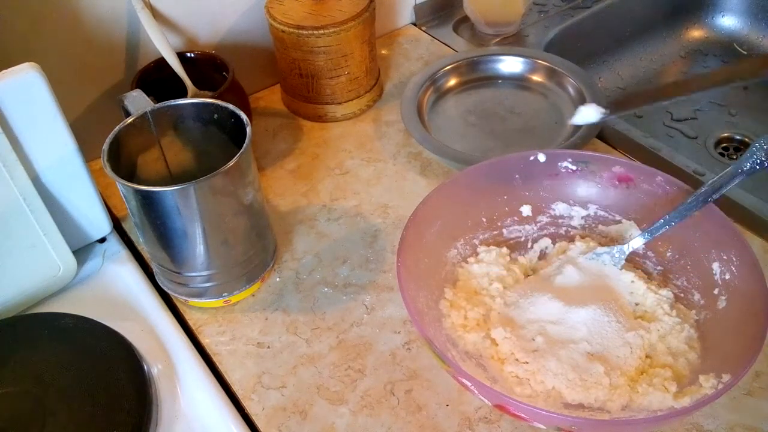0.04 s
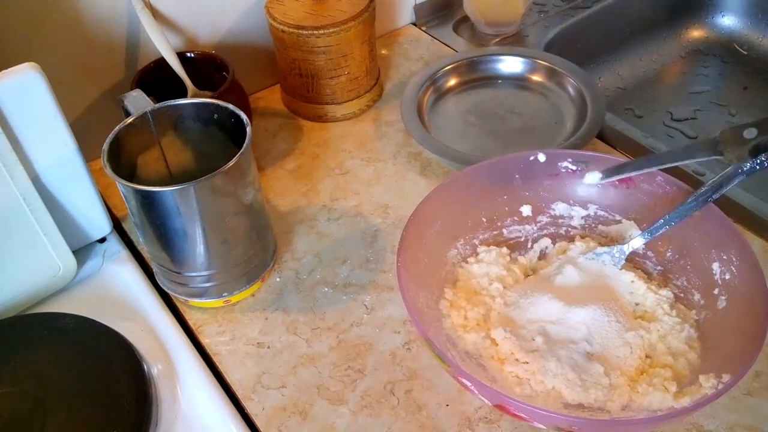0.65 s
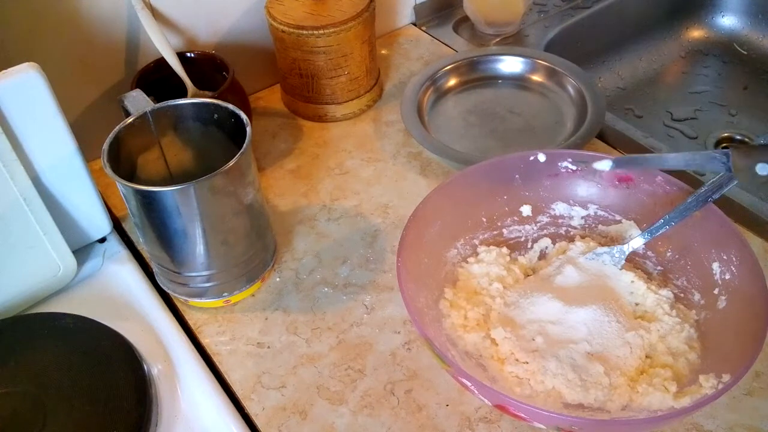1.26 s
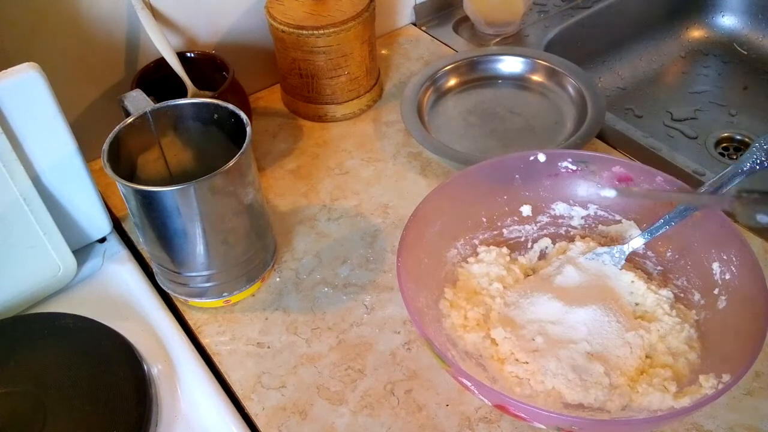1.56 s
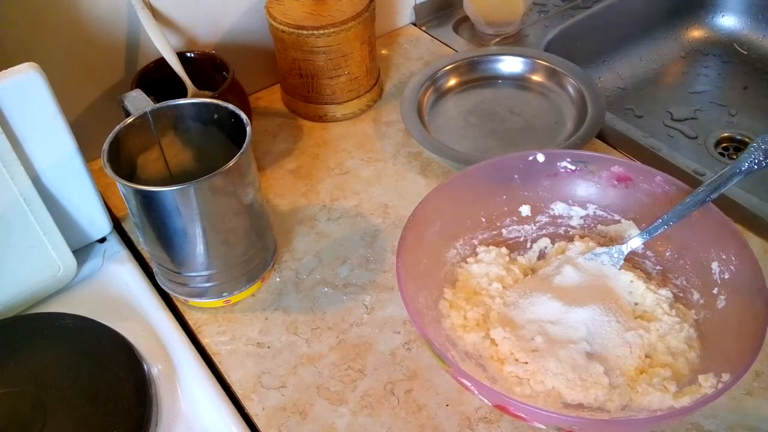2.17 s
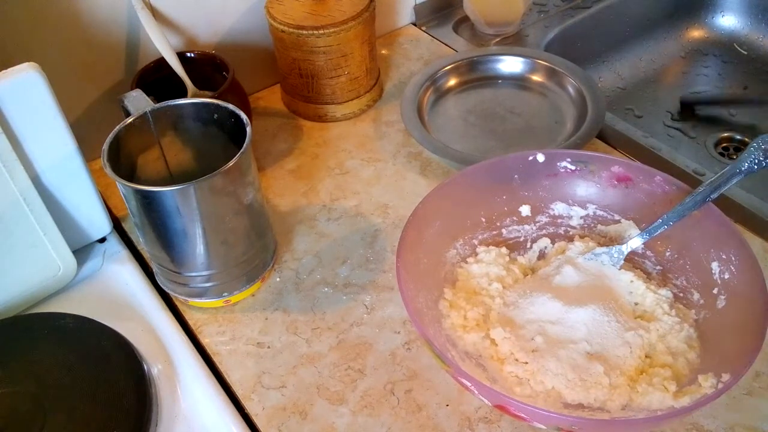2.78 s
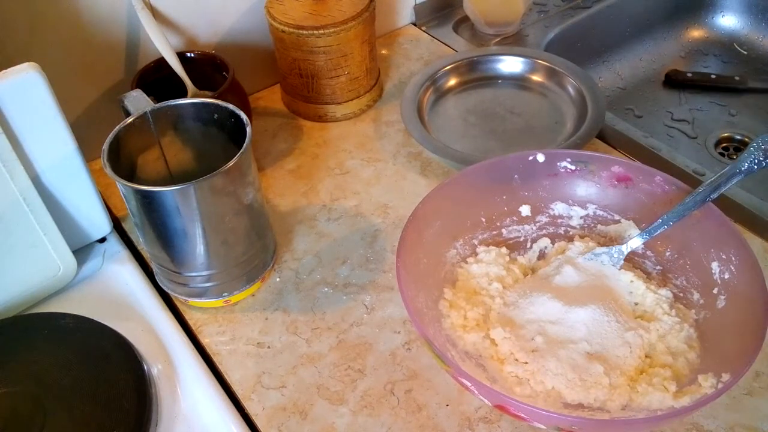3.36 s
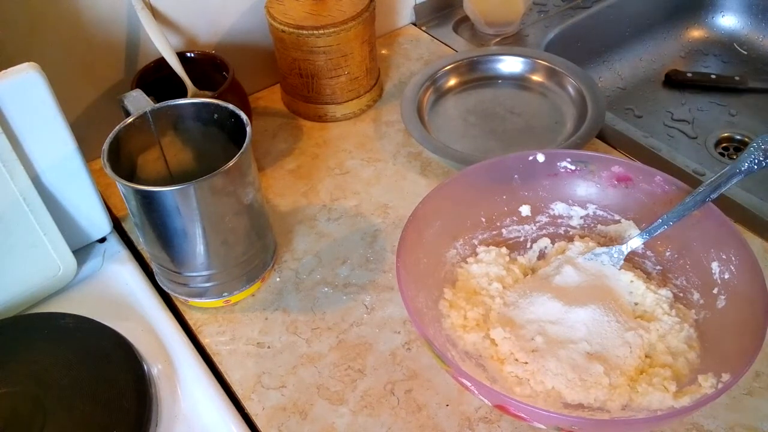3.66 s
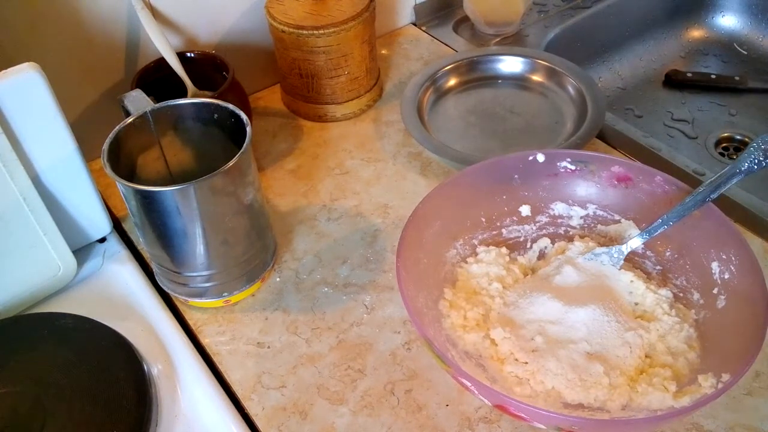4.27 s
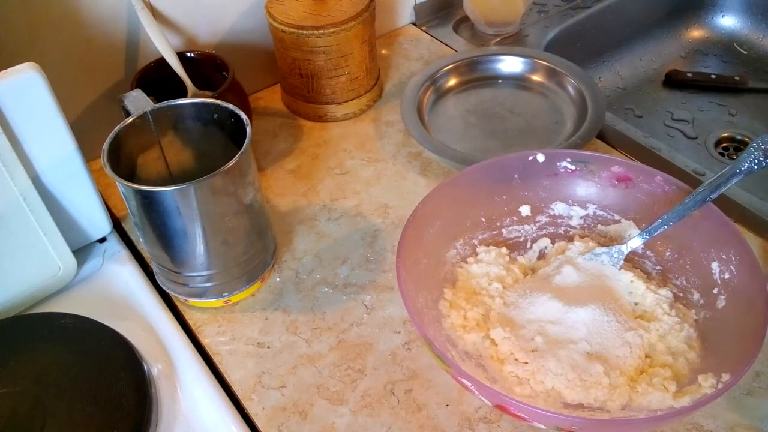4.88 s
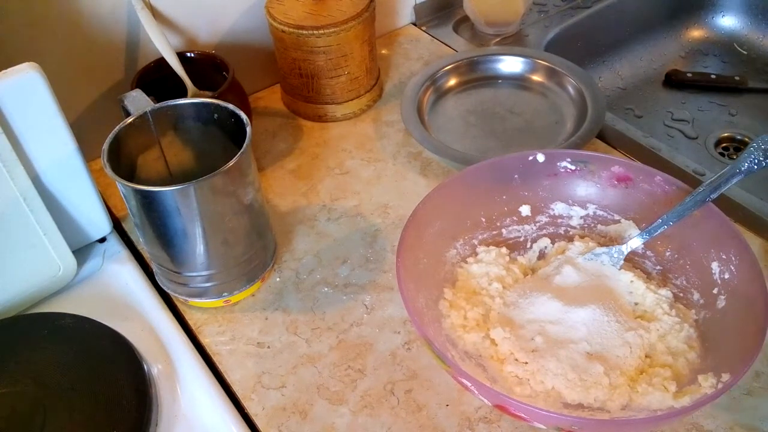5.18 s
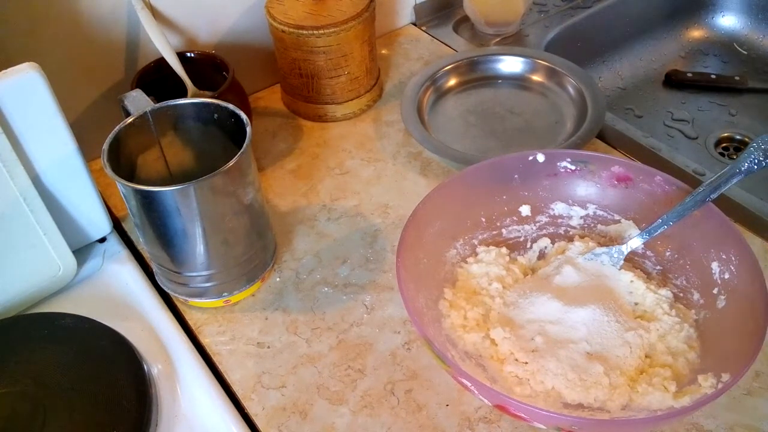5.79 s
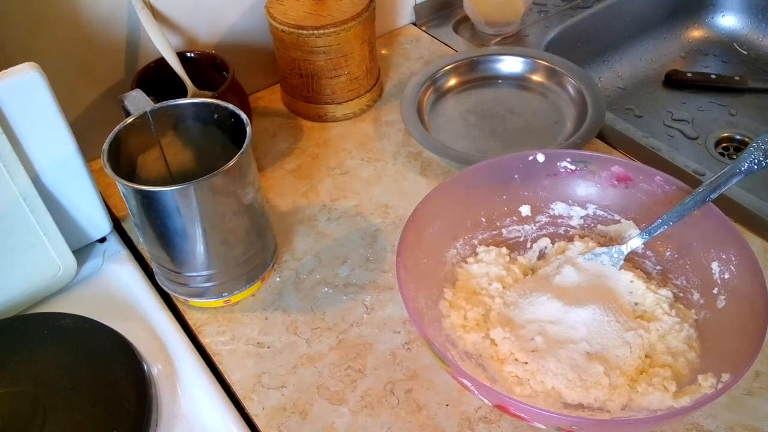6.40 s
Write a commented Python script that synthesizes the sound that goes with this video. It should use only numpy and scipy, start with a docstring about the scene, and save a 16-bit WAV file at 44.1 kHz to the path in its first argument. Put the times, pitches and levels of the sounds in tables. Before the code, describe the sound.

A knife clatters into a steel sink, then a paper sachet is shaken, ripped open and rustled close by in a quiet kitchen.

```python
"""A small kitchen hums faintly. At 2.1 s a table knife drops into a steel sink: the blade strikes, the
handle lands with a duller bonk, the basin rings. From 2.4 s, close to the microphone, a paper sachet is
snatched up and shaken: creases snap, faces flap, powder thuds. At 3.2 s it is ripped open, then fingered,
rustling, until 5.3 s, and gripped again at 6.3 s. The room rings briefly after each sound; the
microphone's resonance near 6.5 kHz sharpens the crackle."""
import sys
import numpy as np
from scipy import signal
from scipy.fft import rfft, irfft
from scipy.io import wavfile
from scipy.ndimage import uniform_filter1d

SR = 44100
rng = np.random.default_rng(int(sys.argv[2]) if len(sys.argv) > 2 else 0)


def dump(signal):
    """Clip the signal to [-1, 1] and save it as 16-bit WAV at the path in sys.argv[1]."""
    limited = np.clip(np.atleast_2d(signal).T, -1, 1)
    pcm = np.round(limited * 32767).astype(np.int16)
    wavfile.write(sys.argv[1], SR, pcm)


N = 288414
TIME = np.arange(N) / SR
PRESS_S = 0.04   # rise of finger pressure

# Paper crackle as heard through the microphone's 6.5 kHz resonance. Each row: frequency in Hz, gain in dB.
PAPER_AT_MIC = [(30, -51.5), (150, -37), (300, -24), (480, -15), (650, -19), (1000, -14), (3000, -11.5),
                (5000, -6), (5900, -0.5), (7100, 1.5), (8200, -6.5), (11000, -14.5), (13500, -17.5),
                (16000, -27.5)]
# Spells of handling the sachet. Each row: start in s, end in s, hiss and dull rub in relative dB.
HANDLING = [(2.39, 5.28, -61.5, -66.5), (2.45, 2.66, -49, -72), (2.745, 2.838, -17.5, -28),
            (2.835, 2.88, -22.5, -25.5), (2.89, 3.17, -32, -43), (3.18, 3.63, -49.5, -65),
            (3.68, 4.13, -46, -57), (4.14, 4.58, -46, -60.5), (4.855, 4.9, -53.5, -71.5),
            (5.195, 5.18, -53, -69.5), (6.325, 6.84, -45.5, -81)]


def knife(basin_db=-12, room_db=-3.5, boom_db=-8, blade_cut_hz=650):
    """Blade and handle strike; the steel basin rings, its walls and the room reflect the blows."""
    # Contacts. Each row: time in s, relative level in dB, rattle decay in ms.
    blade_hits = [(2.0816, 31.5, 4.5), (2.1055, 15.5, 7.1), (2.136, 11.5, 4.6), (2.2192, 5, 1.5),
                  (2.2373, -2.5, 0.85)]
    handle_hits = [(2.2193, 31, 5.2), (2.2375, 13, 3.3)]
    # Contact spectra. Each row: frequency in Hz, gain in dB.
    blade_colour = [(41, -60), (70, -34), (108, -10.5), (208, -20), (250, -5), (606, -18), (834, 0.5),
                    (1050, -10.5), (1540, -0.5), (2120, -11), (2480, -3.5), (3260, -13.5), (6590, -11.5),
                    (13300, -50.5), (16000, -71.5)]
    handle_colour = [(41, -64.5), (70, -36.5), (124, -27.5), (213, -21.5), (293, -16), (554, -16.5),
                     (872, 0.5), (1100, -7), (1610, -9), (1890, -15.5), (2370, -20), (4480, -32),
                     (6450, -28.5), (9490, -60), (16000, -80.5)]
    # Basin modes. Each row: frequency in Hz, relative gain in dB, T60 in s.
    basin_modes = [(651, -47, .28), (770, -41, .22), (818, -42, .22), (851, -37, .25), (922, -39, .26),
                   (974, -42, .28), (1034, -42, .26), (1179, -43, .26), (1357, -42, .24), (1447, -42, .28),
                   (1502, -43, .3), (1567, -39, .18), (1750, -44, .2), (2040, -45, .24), (2293, -45, .24),
                   (2439, -43, .34), (2692, -47, .32), (4124, -47, .24)]
    blade = blows(blade_hits, blade_colour)
    handle = blows(handle_hits, handle_colour)
    strikes = blade + handle
    basin = sum(from_db(db + basin_db) * ring(strikes, hz, t60_s) for hz, db, t60_s in basin_modes)
    echoes = from_db(room_db) * kitchen_reverb(strikes, build_s=0.0042)
    # thin first crack: bass builds only as the whole basin moves
    crack = signal.sosfilt(signal.butter(4, blade_cut_hz, "high", fs=SR, output="sos"), blade)
    return crack + handle + basin + echoes + from_db(boom_db) * counter_boom(strikes)


def sachet(paper_room_db=-6, shake_room_db=1.5, counter_db=-10, counter_delay_s=0.0033, boom_db=-2.5):
    """Close paper sounds with one echo off the counter; the shaking spreads further into the room."""
    # Loudest creases. Each row: time in s, relative level in dB, body and top tilt in dB, decay in ms.
    big_creases = [(2.6171, 0, -21, -10, 1.4), (2.7515, 18, 4, -1.5, 4.9), (2.7635, 25, 9.5, 6, 2.2),
                   (2.7691, 33.5, 1, -1.5, 1.2), (2.9081, 11, 14, 0, 2.1), (2.9172, 13.5, 11.5, -5, 2.7),
                   (2.9518, 11.5, 4, -8, 2.7), (2.9814, 15, -20, -3, 0.43), (3.0197, 7, 12, -16, 2.5),
                   (3.076, 9, -1, -2, 2.07), (3.0825, 17, -4, 0, 4.3), (3.1285, 11.5, -6, 3, 3.3),
                   (3.1642, 6.5, 0, -4.5, 2), (3.3907, -2.5, 14, 10, 1.9), (3.4357, 3.5, -10, -4, 1),
                   (3.458, 3.5, 1, -9, 1.2), (3.7186, 6.5, -12, -4, 2.76), (3.7442, 3.5, 14, -8, 1.66),
                   (3.7769, -0.5, -17.5, -2, 0.5), (3.85, 6, -4, -5, 1.44), (3.892, -2, 16, -1, 1.35),
                   (3.925, 11, -2, -11, 4.7), (3.9969, 4.5, 3, -10, 1.68), (4.0368, 4.5, 10.5, 4, 2.1),
                   (4.1741, 4, 8, -7, 3.05), (4.2144, 0.5, -13, -2.5, 2.1), (4.241, 14, -5, -1, 0.39),
                   (4.2758, 1, -12, 0, 2.5), (4.4112, 8, 0, -6, 1.8), (4.4466, 17, -3, -17, 0.81),
                   (4.4506, 13.5, -12, 5, 2.38), (4.4685, 10.5, -7, 1, 2.97), (4.4735, 12, -1, -1, 4),
                   (4.6637, 11.5, 5, -3, 0.19), (5.0101, 6.5, -4, 8.5, 1.6), (5.0353, 4, -1.5, 3, 2.3),
                   (5.05, -2, -7.5, -3.5, 1.1), (6.392, 6, -47, -2.5, 1.06), (6.4622, 12.5, -47, -5.5, 4.4)]
    creases = snaps(big_creases, level_db=-0.5, uneven_db=3.5)
    creases += snaps(small_creases(), level_db=1.5, uneven_db=5)
    paper = creases + rustle() + rip() + finger_taps()
    shaking = shake()
    counter_echo = from_db(counter_db) * np.interp(TIME - counter_delay_s, TIME, paper)
    room_send = from_db(paper_room_db) * paper + from_db(shake_room_db) * shaking
    echoes = kitchen_reverb(room_send, build_s=0.00077)
    return paper + counter_echo + shaking + echoes + from_db(boom_db) * counter_boom(shaking)


def snaps(creases, level_db, uneven_db, creak_db=-19, creak_lead_s=0.0025, creak_ms=2, facet_count=20):
    """Each crease creaks, then buckles; the facets beside it add spectral peaks and hollows."""
    # Band centres in Hz: body, middle, microphone resonance, top.
    bands_hz = [700, 2400, 6400, 12000]
    facet_hz = np.geomspace(300, 14000, facet_count)
    facets_db = uneven_db * np.clip(rng.standard_normal((len(creases), facet_count)), -2, 2)
    out = np.zeros(N)
    for (start_s, db, body_db, top_db, decay_ms), facet_db in zip(creases, facets_db):
        middle_db = -0.53 + 0.32 * max(body_db, top_db, 0)   # full or bright creases lift the middle
        tilt = list(zip(bands_hz, [body_db, middle_db, 0, top_db]))
        plain = response(PAPER_AT_MIC, tilt)
        faceted = response(PAPER_AT_MIC, tilt, np.column_stack([facet_hz, facet_db]))
        faceted *= np.linalg.norm(plain) / np.linalg.norm(faceted)   # facets change colour, not energy
        impulse = from_db(db + level_db) * faceted
        add(out, start_s - creak_lead_s, from_db(creak_db) * burst(creak_ms, impulse))
        add(out, start_s, burst(decay_ms, impulse))
    return out


def small_creases(per_s=46, firm_grip_db=-50.5, top_db=-3, decay_ms=1.1, count=100):
    """Rows for snaps(): creases give way at random under a firm grip, louder the firmer it is."""
    rows = []
    for start_s, end_s, hiss_db, _ in HANDLING:
        waits_s = rng.uniform(0.3, 1.7, count) / per_s
        scatter = np.clip(rng.standard_normal((count, 2)), -2, 2)
        grip_db = hiss_db - firm_grip_db
        for time_s, (size, body) in zip(start_s + PRESS_S + np.cumsum(waits_s), scatter):
            if grip_db > 0 and time_s < min(end_s, TIME[-1]):
                relative_db = -18 + 0.8 * grip_db + 3.5 * size
                body_db = 8 * body
                rows.append((time_s, relative_db, body_db, top_db, decay_ms))
    return rows


def shake():
    """The sachet's faces flap; the powder thuds into its foot."""
    # Blows. Each row: time in s, relative level in dB, decay in ms.
    flaps = [(2.752, 6, 8.5), (2.766, 8.5, 14.3), (2.797, 12.5, 8.4), (2.868, 5, 8.5), (2.909, 13, 10),
             (2.948, 4.5, 8.3), (3.0205, 12, 5.5), (3.083, 2.5, 9.4), (3.13, -6.5, 16), (3.165, -7.5, 2.47)]
    thuds = [(3.021, 14.5, 6), (3.084, 3.5, 5.5), (3.135, 3, 7.9)]
    # Their spectra. Each row: frequency in Hz, gain in dB.
    flap_colour = [(25, -14), (70, -21.5), (115, -1.5), (190, -15.5), (330, -1), (620, 3.5), (1000, -7.5),
                   (1600, -10.5), (3000, -15.5), (8000, -37)]
    thud_colour = [(30, -16.5), (80, -11.5), (120, 3), (190, -7), (500, -12), (750, -14), (1300, -39.5)]
    return blows(flaps, flap_colour) + blows(thuds, thud_colour)


def rip(jitter=0.57):
    """Paper tears in jerks; then fibres part one by one at an uneven, falling rate."""
    # Jerks. Each row: time in s, relative level in dB, decay in ms.
    jerks = [(3.2445, -10, 2), (3.2497, 11, 6.3), (3.2545, 15, 7.4), (3.2685, 6, 2.9), (3.2725, 14.5, 7.1),
             (3.279, 10.5, 4.1), (3.2925, 6, 1.6)]
    # Tearing as heard through the microphone. Each row: frequency in Hz, gain in dB.
    tear_colour = [(100, -27), (900, -23), (3500, -16), (5600, -6.5), (6900, 12.5), (7900, -1), (8900, 6),
                   (11000, -6.5), (13300, -2.5), (16000, -16.5)]
    # Closing zip. Each row: time in s, fibre rate in Hz, level in dB.
    zip_glide = [(3.285, 2900, -64.5), (3.31, 2268, -38.5), (3.329, 1562, -50), (3.361, 1040, -59)]
    times_s, glide_hz, glide_db = np.transpose(zip_glide)
    rate_hz = np.interp(TIME, times_s, glide_hz) * (1 + jitter * wobble(window_samples=12))
    envelope = from_db(np.interp(TIME, times_s, glide_db, left=-150, right=-150))
    zip_tone = envelope * np.sin(2 * np.pi * np.cumsum(rate_hz) / SR)
    return blows(jerks, tear_colour) + zip_tone


def rustle(hiss_trim_db=-4.5, rub_trim_db=-3.5, release_s=0.013994, wobble_db=2.3, wobble_s=0.05):
    """Fibres catch and slip under wavering finger pressure: fine bright hiss over a coarser, dull rub."""
    # Rub spectrum. Each row: frequency in Hz, gain in dB.
    rub_colour = [(120, -22.5), (400, 4.5), (900, 0), (2000, 3), (4000, -8.5), (9000, -31.5)]
    fine = crinkles(per_s=8400, spread_db=1.5, low_hz=1982, high_hz=15200, t60_cycles=7.3)
    coarse = crinkles(per_s=1500, spread_db=0.5, low_hz=296, high_hz=4900, t60_cycles=18)
    hiss = from_db(hiss_trim_db) * coloured(fine, PAPER_AT_MIC)
    rub = from_db(rub_trim_db) * coloured(coarse, rub_colour)
    out = np.zeros(N)
    for start_s, end_s, hiss_db, rub_db in HANDLING:
        press = np.clip((TIME - start_s) / PRESS_S, 0, 1) ** 2
        release = np.exp(-np.clip(TIME - end_s, 0, 1) / release_s)
        out += press * release * (from_db(hiss_db) * hiss + from_db(rub_db) * rub)
    return out * from_db(wobble_db * wobble(round(wobble_s * SR)))


def crinkles(per_s, spread_db, low_hz, high_hz, t60_cycles, pitch_count=14):
    """Tiny random buckles of uneven size, each ringing briefly at one of several pitches."""
    sizes = from_db(spread_db * np.minimum(rng.exponential(1, N), 4))
    clicks = (rng.random(N) < per_s / SR) * sizes * rng.choice([-1, 1], N)
    pitch_index = rng.integers(0, pitch_count, N)
    pitches_hz = np.geomspace(low_hz, high_hz, pitch_count)
    return sum(hz * ring(clicks * (pitch_index == k), hz, t60_cycles / hz)
               for k, hz in enumerate(pitches_hz))


def finger_taps():
    """Fingertips knock dully on the paper."""
    # Taps. Each row: time in s, relative level in dB, decay in ms.
    taps = [(2.676, -8.5, 0.62), (3.358, -12, 3), (3.746, -10.5, 1), (4.044, -9.5, 7.1), (4.081, -9, 1.4),
            (4.249, -2.5, 2.1), (4.277, -7, 1.9), (4.375, -9, 3)]
    # Tap spectrum. Each row: frequency in Hz, gain in dB.
    tap_colour = [(40, -33.5), (130, -18.5), (460, -5), (680, -5.5), (1200, -0.5), (3000, -2.5), (6000, -7),
                  (12000, -23)]
    return blows(taps, tap_colour)


def counter_boom(x):
    """Counter and room resonate under low blows."""
    # Low modes. Each row: frequency in Hz, relative gain in dB, T60 in s.
    low_modes = [(118, -51, .55), (250, -47, .42), (323, -47, .35), (373, -48, .35)]
    return sum(from_db(db) * ring(x, hz, t60_s) for hz, db, t60_s in low_modes)


def kitchen_reverb(x, build_s, size=32768):
    """Diffuse reflections of unit energy build up, then die at each band's own rate."""
    # Room decay. Each row: band centre in Hz, T60 in s.
    room_decay = [(100, 0.26), (400, 0.34), (1200, 0.27), (3500, 0.26), (7000, 0.21), (15000, 0.16)]
    centres_hz, t60s_s = np.transpose(room_decay)
    time_s = np.arange(size) / SR
    bins_hz = np.arange(size // 2 + 1) * SR / size
    white = rfft(rng.standard_normal(size))
    tail = np.zeros(size)
    for weights, t60_s in zip(np.eye(len(centres_hz)), t60s_s):
        band = irfft(white * at_hz(np.column_stack([centres_hz, weights]), bins_hz))
        tail += band * from_db(-60 * time_s / t60_s)
    tail *= 1 - np.exp(-time_s / build_s)
    return signal.fftconvolve(x, tail / np.linalg.norm(tail))[:N]


def room_tone(air_db=-65.5, whine_hz=3070, whine_width_hz=200):
    """Soft noise, faint hums, narrow hiss at the microphone's resonance, a whine that comes and goes."""
    # Noise spectrum. Each row: frequency in Hz, relative density in dB.
    air_colour = [(25, -21.5), (70, -10.5), (145, 4), (240, -0.5), (330, -5), (800, -7), (2000, -11),
                  (4500, -13.5), (6500, -12.5), (9000, -17.5), (15500, -17.5)]
    # Noise drift. Each row: time in s, offset in dB.
    air_drift = [(0, -3), (2, -1), (5.4, 1), (6.54, 0)]
    # Faint hums, and a narrow hiss at the microphone's 6.5 kHz resonance.
    # Each row: frequency in Hz, resonance width in Hz, level in dB.
    narrow_bands = [(238.3, 14, -84), (602, 20, -83), (1439, 110, -84.5), (6550, 240, -81)]
    # Whine envelope. Each row: time in s, level in dB.
    whine_levels = [(0, -88), (.9, -85), (1.3, -79), (1.9, -80), (2.6, -91), (5.1, -85.5), (5.4, -71),
                    (5.75, -79.5), (6.54, -90.5)]
    air_gain = from_db(air_db + np.interp(TIME, *np.transpose(air_drift)))
    air = air_gain * coloured(rng.standard_normal(N), air_colour)
    hums_and_hiss = sum(from_db(db) * narrow_noise(hz, width_hz) for hz, width_hz, db in narrow_bands)
    whine_gain = from_db(np.interp(TIME, *np.transpose(whine_levels)))
    return air + hums_and_hiss + whine_gain * narrow_noise(whine_hz, whine_width_hz)


def narrow_noise(hz, width_hz):
    """Noise passed twice through one resonance: a wavering tone, rms 1."""
    t60_s = np.log(1000) / (np.pi * width_hz)
    first_pass = rms_one(ring(rng.standard_normal(N), hz, t60_s))
    return rms_one(ring(first_pass, hz, t60_s))


def blows(rows, colour):
    """One burst per row, all of one colour."""
    out = np.zeros(N)
    impulse = response(colour)
    for start_s, db, decay_ms in rows:
        add(out, start_s, from_db(db) * burst(decay_ms, impulse))
    return out


def burst(decay_ms, impulse, size=4096):
    """A dying flurry of tiny contacts, of unit energy, filtered by an impulse response."""
    fade = np.exp(-np.arange(size) / (SR * decay_ms / 1000))
    flurry = rng.standard_normal(size) * fade
    for _ in range(4):   # flatten the spectrum, restore the decay
        spectrum = rfft(flurry)
        flurry = irfft(spectrum / (np.abs(spectrum) + 1e-12)) * np.minimum(1, 2 * fade)
    return signal.fftconvolve(flurry / np.linalg.norm(flurry), impulse)


def ring(x, hz, t60_s):
    """Damped resonator: a unit click starts a sine of height 1."""
    radius = from_db(-60 / (t60_s * SR))
    step_rad = 2 * np.pi * hz / SR
    feedback = [1, -2 * radius * np.cos(step_rad), radius ** 2]
    return signal.lfilter([0, np.sin(step_rad)], feedback, x + 1e-18)


def response(*colours, size=2048):
    """Minimum-phase impulse response of chained (Hz, dB) colours."""
    bins_hz = np.arange(size // 2 + 1) * SR / size
    gain_db = sum(at_hz(colour, bins_hz) for colour in colours)
    cepstrum = irfft(np.log(from_db(gain_db)))
    cepstrum[1:size // 2] *= 2
    cepstrum[size // 2 + 1:] = 0
    return irfft(np.exp(rfft(cepstrum)))


def coloured(x, colour):
    """Filter a full-length signal by a (Hz, dB) colour; rms 1."""
    bins_hz = np.arange(N // 2 + 1) * SR / N
    return rms_one(irfft(rfft(x) * from_db(at_hz(colour, bins_hz)), N))


def wobble(window_samples):
    """Moving average of noise; rms 1."""
    return rms_one(uniform_filter1d(rng.standard_normal(N), window_samples))


def at_hz(points, hz):
    """Read a (Hz, value) table on a log-frequency axis."""
    points_hz, values = np.transpose(points)
    return np.interp(np.log(np.maximum(hz, 1)), np.log(points_hz), values)


def add(track, start_s, sound):
    """Mix a sound into the track."""
    at = round(start_s * SR)
    track[at:at + len(sound)] += sound[:N - at]


def from_db(db):
    """Decibels to gain."""
    return 10 ** (np.asarray(db) / 20)


def rms_one(x):
    """Scale to rms 1."""
    return x / np.sqrt(np.mean(x ** 2) + 1e-20)


def scene():
    """Knife, sachet and kitchen in mono."""
    return (knife() + sachet() + room_tone())[None]


def record(dry):
    """Clip peaks at full scale, then low-pass at 16 kHz."""
    lowpass = signal.ellip(10, 0.1, 70, 16000, fs=SR, output="sos")
    return signal.sosfilt(lowpass, np.clip(dry, -1, 1))


dry = scene()
out = record(dry)
dump(out)
```